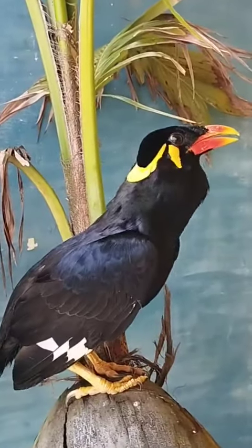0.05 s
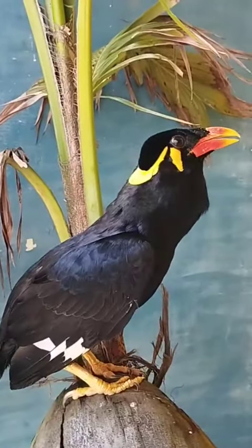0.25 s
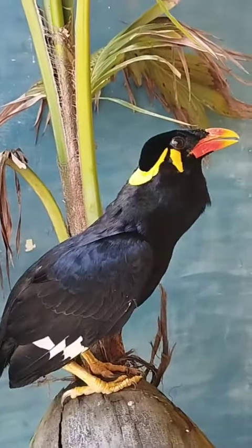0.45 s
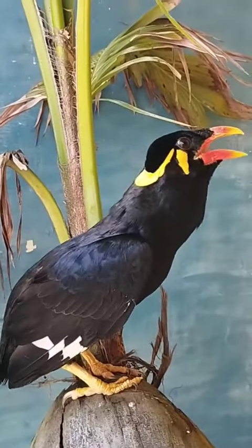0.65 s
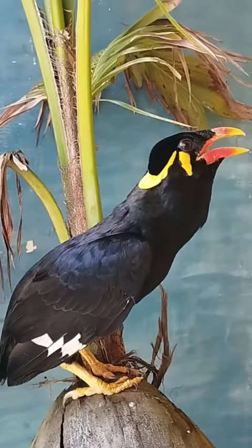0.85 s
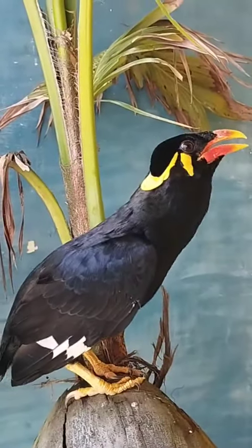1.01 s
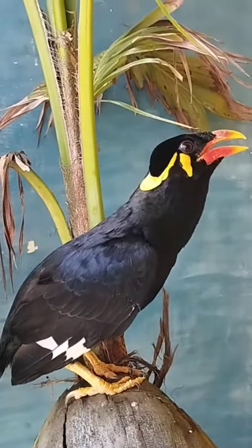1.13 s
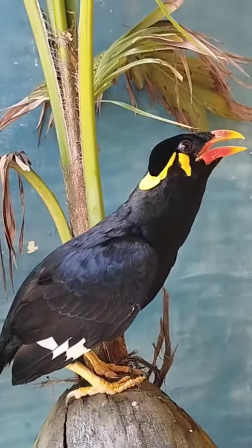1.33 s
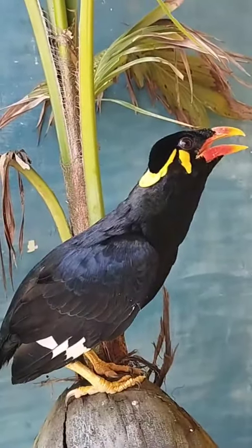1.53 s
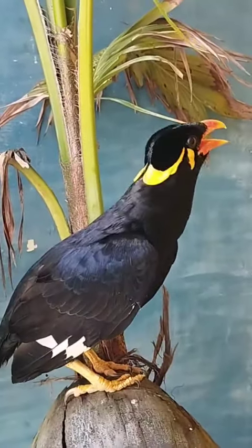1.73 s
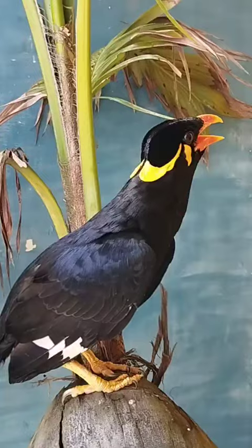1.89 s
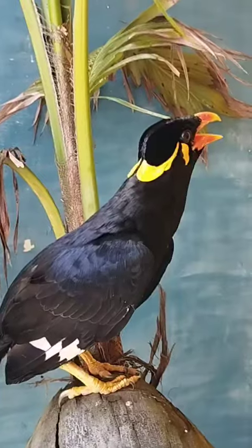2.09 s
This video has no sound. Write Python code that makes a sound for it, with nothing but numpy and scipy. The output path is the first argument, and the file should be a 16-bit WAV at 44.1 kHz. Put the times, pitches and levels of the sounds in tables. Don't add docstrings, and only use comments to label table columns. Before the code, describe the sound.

In an echoing walled yard, a perched bird whistles a fast, pulsing warble that jumps higher, pauses, then adds two soft breathy notes; distant birds call faintly over traffic rumble, heard close in stereo.

```python
import sys
import numpy as np
from scipy import signal
from scipy.fft import rfft, irfft, next_fast_len
from scipy.io import wavfile
from scipy.ndimage import uniform_filter1d

SR = 44100
rng = np.random.default_rng(int(sys.argv[2]) if len(sys.argv) > 2 else 0)


def file_out(sig):
    cols = np.atleast_2d(sig).T
    lim = np.clip(cols, -1, 1)
    pcm = np.round(lim * 32767).astype(np.int16)
    wavfile.write(sys.argv[1], SR, pcm)


def to_linear_factor(level_db):
    exponent = np.asarray(level_db, float) / 20
    return 10 ** exponent


N = 94815
T = np.arange(N) / SR

# trough in seconds, trough pitch in Hz, top in seconds, top pitch in Hz.
ARCHES = [(-.02, 559.6, 0.032, 650.4), (0.085, 525.4, 0.15, 669), (.192, 601.3, 0.26, 905.9),
          (0.312, 780.7, 0.35, 911.3), (0.411, 659.8, .442, 772), (0.499, 629.2, 0.54, 714),
          (.58, 604.8, .625, 770.5), (.658, 730, 0.69, 755.6), (.697, 745, .733, 1231),
          (0.734, 1240, .775, 1328), (0.81, 1130, .848, 1304), (0.904, 1143, 0.87, 1298),
          (0.964, 1013, 0.94, 1100)]
# time in seconds, whistle level in dB, octave level in dB, rasp level in dB.
BREATH = [(0.031, -38.5, -63, -64.5), (0.141, -29, -59, -74), (0.216, -20.5, -47.5, -50.5),
          (.24, -18, -38.5, -50.5), (0.278, -6, -44, -42), (.3, -20, -53.5, -47), (.345, -15, -59, -47),
          (.442, -28, -50, -60.5), (0.532, -20.5, -51.5, -63), (.565, -28, -58.5, -64.5),
          (0.615, -18, -44.5, -47.5), (0.675, -18.5, -48.5, -45.5), (.695, -25.5, -44, -46),
          (0.709, -9, -30.5, -33.5), (0.739, -1, -37, -34.5), (0.773, -11.5, -35, -42), (.8, -24, -37, -50),
          (.83, -7, -39.5, -49), (.852, -20.5, -50, -56), (.876, -8.5, -43, -53.5), (0.9, -11.5, -42, -57),
          (.932, -20, -51.5, -59.5), (0.955, -32.5, -44, -88), (0.977, -47, -87, -121.5)]
DIP_DB, DIP_S, DIP_LAG_S = 17.5, 0.018, 0.00061
ROUND = 1.1
FADE_DB = 5.5


def warble():
    arches = np.array(ARCHES)
    times, hz = arches[:, ::2].ravel(), arches[:, 1::2].ravel()
    place = np.interp(T, times, np.arange(len(times)))
    i = np.minimum(place.astype(int), len(times) - 2)
    u = place - i
    falling = i % 2
    from_top = np.where(falling, u, 1 - u)
    fall = .5 - .5 * np.cos(np.pi * from_top ** ROUND)
    pitch = hz[i] + (hz[i + 1] - hz[i]) * np.where(falling, fall, 1 - fall)

    depth = np.clip((arches[:, 3] - arches[:, 1]) / arches[:, 3] / 0.18, 0, 1)
    dip = np.zeros(N)
    for trough, d in zip(arches[:, 0], depth):
        dip += DIP_DB * d * np.exp(-((T - trough - DIP_LAG_S) / DIP_S) ** 4)
    next_depth = depth[np.minimum(i // 2 + 1, len(arches) - 1)]
    fade = dip + FADE_DB * falling * next_depth * np.sin(np.pi * u) ** .5

    t, *columns = np.transpose(BREATH)
    level, octave, rasp = (np.interp(T, t, c, right=-120) for c in columns)
    return voice(pitch, level - fade, octave - .5 * fade, rasp - 0.34 * dip)


# multiple of the pitch, level in dB over the octave.
OVERTONES = [(2, 0), (3, -7), (4, -15), (5, -24), (6, -33), (8, -45)]
# frequency in Hz, level in dB per Hz.
HISS_L = [(1400, -3.5), (2200, 16.5), (6000, -10), (8700, -19.5), (9500, 6.5), (10300, -8), (11200, -14),
          (13500, 1.5), (15600, -6)]
JITTER = 0.0013
BLUR = 1.1
BUZZ = .7


def voice(hz, level_db, octave_db, rasp_db):
    phase = 2 * np.pi * np.cumsum(hz * (1 + JITTER * wobble(150))) / SR
    k = np.arange(2, 24)[:, None]
    partials = np.sin(k * phase + BLUR * wobble(110, count=22)) * (k * hz < 16000)
    partials = partials * (1 + 0.063 * wobble(40, count=22))

    overtone_gain = to_linear_factor(np.interp(k, *np.transpose(OVERTONES), right=-60))
    low = patched((overtone_gain * partials).sum(0), patchy_db=3.0)
    low = low * to_linear_factor(4.1 * wobble(59.66) - 2)

    hiss = rng.standard_normal(N) * (1 + np.cos(phase))
    rasp = BUZZ ** .5 * unit(partials[5:].sum(0)) + (1 - BUZZ) ** .5 * unit(hiss)
    rasp = filtered(rasp, lambda f: to_linear_factor(along(HISS_L, f)))
    rasp = unit(patched(rasp, patchy_db=5.5))
    return 2 ** .5 * (to_linear_factor(level_db) * np.sin(phase) + to_linear_factor(octave_db) * low) + to_linear_factor(rasp_db) * rasp


# start in seconds, length in seconds, pitch in Hz, level in dB.
SECOND = [
    (0.138, 0.09, 780, -46),
    (0.284, 0.037, 1000, -27),
    (0.364, 0.031, 982, -31.5),
    (.46, 0.03, 858, -33.5),
    (0.578, 0.025, 870, -56),
    (0.66, 0.044, 943.5, -26),
    (0.937, 0.031, 1726, -38),
]


def second_voice():
    out = np.zeros(N)
    for start, length, hz, db in SECOND:
        u = np.clip((T - start) / length, 0, 1)
        level = to_linear_factor(db + 6 + 0.37 * wobble(99)) * np.sin(np.pi * u)
        pitch = hz * (1.01 - 0.073 * u + 0.021 * wobble(110))
        out += level * np.sin(2 * np.pi * np.cumsum(pitch) / SR)
    return out


# time in seconds, pitch in Hz, level in dB.
SOFT_1 = [
    (1.385, 466, -42),
    (1.412, 504.7, -45),
    (1.428, 696, -38),
    (1.49, 793.5, -33),
    (1.56, 863.4, -32.5),
    (1.574, 815.4, -45.5),
    (1.584, 699.6, -23.5),
    (1.61, 677.3, -40),
    (1.65, 519.6, -37.5),
    (1.71, 495, -49),
]
SOFT_2 = [
    (1.83, 484.5, -47),
    (1.855, 552, -48),
    (1.875, 724, -33.5),
    (1.9, 763.6, -27.5),
    (1.92, 751.3, -30),
    (1.938, 778.6, -39.5),
    (1.96, 753, -30.5),
    (1.978, 749, -59),
    (2.012, 721.5, -34),
    (2.03, 723, -59),
]
SOFT_OCTAVE_DB, SOFT_RASP_DB = -35, -34
FLUTTER_HZ, FLUTTER = 67.32, 0.38
SOFT_EDGE_HZ, SOFT_EDGE_DB = 12600, 8.5


def soft_notes():
    hz, db = np.where(T < 1.79, glide(SOFT_1), glide(SOFT_2))
    hz = hz * (1 + 0.017 * wobble(50))
    x = voice(hz, db + 4.5 * wobble(45.09), db + SOFT_OCTAVE_DB, db + SOFT_RASP_DB)
    flutter_hz = FLUTTER_HZ * (1 + 0.2025 * wobble(15))
    x = x * (1 + FLUTTER * np.sin(2 * np.pi * np.cumsum(flutter_hz) / SR))
    head = [(1200, 0), (2000, -10), (10500, -10), (SOFT_EDGE_HZ, SOFT_EDGE_DB), (15000, -3)]  # Hz, dB
    return filtered(x, lambda f: to_linear_factor(along(head, f)))


def glide(rows):
    s, hz, db = np.transpose(rows)
    pitch = uniform_filter1d(np.interp(T, s, hz), 600)
    level = uniform_filter1d(np.interp(T, s, db, -90, -90), 400)
    return pitch, level


# time in seconds, level in dB.
TICKS = [
    (1.116, -51),
    (2.03, -46),
]


def claws():
    shape = sum(to_linear_factor(db - 60 * (T - s).clip(0) / 0.0067) * (T >= s) for s, db in TICKS)
    return filtered(shape * rng.standard_normal(N), lambda f: 1 / (1 + (11000 / (f + 1)) ** 6))


# time in seconds, pitch in Hz, level in dB.
FAR_1 = [
    (1.15, 735.6, -43),
    (1.18, 754, -62),
    (1.23, 823, -53),
    (1.28, 811, -50.5),
    (1.3, 696, -44.5),
    (1.33, 765, -71),
]
FAR_2 = [
    (2.08, 504.3, -44.5),
    (2.11, 645, -55.5),
    (2.13, 687, -34),
    (2.16, 729, -18.5),
]
FAR_3 = [
    (2.03, 1150, -45.5),
    (2.07, 1326, -46.5),
    (2.11, 1650, -45),
    (2.16, 2357, -39.5),
]
FAR_4 = [
    (-.02, 3062, -68),
    (.1, 3040, -66),
    (.22, 2980, -72),
]


def far_birds():
    return (far_call(FAR_1, octave_db=-36.0, rough=0.0033) + far_call(FAR_2, octave_db=-7.5, rough=0.0012)
            + far_call(FAR_3, octave_db=-23, rough=0.02) + far_call(FAR_4, octave_db=-40, rough=0.016))


def far_call(rows, octave_db, rough):
    hz, db = glide(rows)
    phase = 2 * np.pi * np.cumsum(hz * (1 + rough * wobble(130))) / SR
    return 2 ** .5 * to_linear_factor(db) * (np.sin(phase) + to_linear_factor(octave_db) * np.sin(2 * phase))


# delay in seconds, left level in dB, right level in dB.
ECHOES = [
    (.0058, -6, -12),
    (.0095, -29, -10),
    (.017, -9.5, -24),
    (.031, -16.5, -17),
    (.047, -18.5, -12.5),
    (.095, -15, -16),
]
# frequency in Hz, seconds to fall by 60 dB.
YARD = [(500, 0.43), (1300, 0.5), (4000, 0.7), (12000, 0.051)]
WET_DB = -10


def yard(x):
    hz, t, z = signal.stft(rng.standard_normal((2, SR)), SR, nperseg=256)
    decay = to_linear_factor(-60 * t / along(YARD, hz)[:, None])
    tail = signal.istft(z * decay * np.clip(t / 0.015, 0, 1), SR, nperseg=256)[1]
    late = signal.fftconvolve(x[None], tail / np.linalg.norm(tail[0]), axes=1)[:, :N]
    early = filtered(x, lambda f: sum(to_linear_factor([[l], [r]]) * np.exp(-2j * np.pi * f * s) for s, l, r in ECHOES))
    return early + to_linear_factor(WET_DB) * late


# frequency in Hz, level in dB per Hz.
RUMBLE = [(20, -33.5), (34, 3.5), (92, 1), (106, -5.5), (124, -12.5), (178, -9), (257, -17), (269, -16.5),
          (300, -15), (390, -56.5), (660, -120)]
AIR = [(150, -13.5), (250, -10), (413, -5), (527, -13), (772, -12), (857, -8.5), (1020, -15), (1420, -12.5),
       (15800, -50)]
# pitch in Hz, level in dB.
HUMS = [(48, -47.5), (68, -46), (86, -44.5), (217, -57), (487, -57.5), (540, -66.5)]
RUMBLE_DB, AIR_DB = -34, -48.5


def traffic():
    hums = np.zeros(N)
    for hz, db in HUMS:
        level = to_linear_factor(db + 6.3 * wobble(9.78))
        hums += level * np.sin(2 * np.pi * np.cumsum(hz * (1 + 0.01628 * wobble(4.3))) / SR)
    rumble = to_linear_factor(RUMBLE_DB - 3.0 + 1.4 * wobble(2.6)) * rush(RUMBLE, patchy_db=-1.5)
    return rumble + hums + to_linear_factor(AIR_DB + 1.5) * rush(AIR, patchy_db=1.0)


# frequency in Hz, likeness from 0 to 1.
ALIKE = [(60, 0.97), (200, 0.88), (600, 0.5), (2000, 0.17), (8000, 0.029)]


def rush(spectrum, patchy_db):
    pair = patched(rng.standard_normal((2, N)), patchy_db)

    def response(hz):
        turn = np.arccos(np.clip(along(ALIKE, hz), -1, 1)) / 2
        return to_linear_factor(along(spectrum, hz)) * [np.cos(turn), np.sin(turn)]

    mid, side = filtered(pair, response)
    return unit(np.array([mid + side, mid - side]))


def patched(x, patchy_db):
    z = signal.stft(x, nperseg=512)[2]
    field = uniform_filter1d(rng.standard_normal(z.shape[-2:]), 3, 0)
    field = uniform_filter1d(field, 12, 1)
    return signal.istft(z * to_linear_factor(patchy_db * unit(field)), nperseg=512)[1][..., :N]


def wobble(rate, count=1):
    knots = rng.standard_normal((count, int(N * rate / SR) + 4))
    place = np.arange(N) * rate / SR
    i = place.astype(int)
    u = .5 - .5 * np.cos(np.pi * (place % 1))
    return np.squeeze(knots[:, i] * (1 - u) + knots[:, i + 1] * u)


def filtered(x, response):
    m = next_fast_len(N + 8192)
    return irfft(rfft(x, m) * response(np.fft.rfftfreq(m, 1 / SR)), m)[..., :N]


def along(points, hz):
    f, v = np.transpose(points)
    return np.interp(np.log(hz + 1), np.log(f + 1), v)


def unit(x):
    return x / np.sqrt(np.mean(x ** 2) + 1e-20)


# frequency in Hz, level in dB.
HISS_R = [(5000, 0), (8500, -1), (10500, -1), (11800, -6), (13000, -9), (15500, -9)]
RIGHT_DB, LAG_S = .6, 0.00017
FAR_DRY_DB, SOFT_DRY_DB = -6.5, 0
DUCK_DB, DUCK_FROM_DB = 5.5, -18.5


def scene():
    near = warble() + second_voice() + claws()
    soft, far = soft_notes(), far_birds()
    direct = near + to_linear_factor(SOFT_DRY_DB) * soft + to_linear_factor(FAR_DRY_DB) * far
    direct = filtered(direct, lambda f: np.exp(1j * np.pi * f * LAG_S * np.array([[1], [-1]])))
    birds = direct + yard(near + to_linear_factor(3.5) * (soft + far))
    birds = filtered(birds, lambda f: np.array([np.ones(len(f)), to_linear_factor(RIGHT_DB + along(HISS_R, f))]))
    loud_db = 10 * np.log10(abs(uniform_filter1d(birds[0] ** 2, 4000)) + 1e-9)
    duck = to_linear_factor(-DUCK_DB * np.clip((loud_db - DUCK_FROM_DB) / 10, 0, 1))
    return birds + traffic() * duck


def low_pass(x):
    return signal.sosfilt(signal.butter(12, 16130, fs=SR, output="sos"), x)


def record(dry):
    return low_pass(dry)


dry = scene()
out = record(dry)
file_out(out)
```